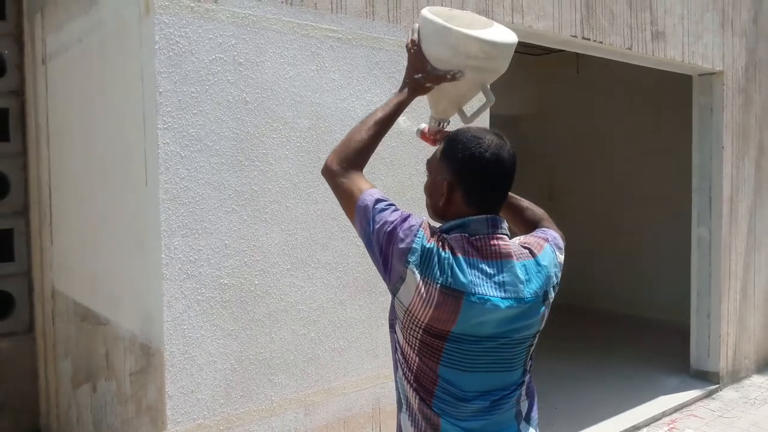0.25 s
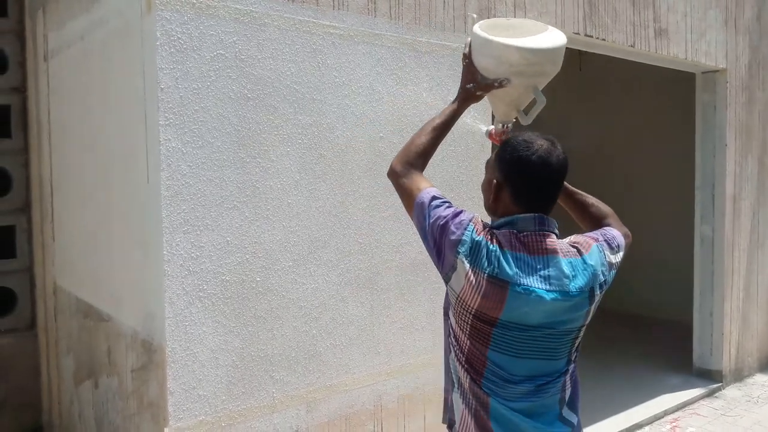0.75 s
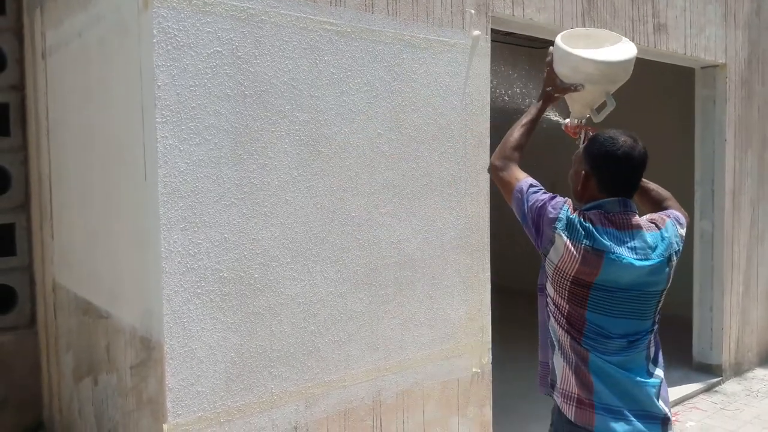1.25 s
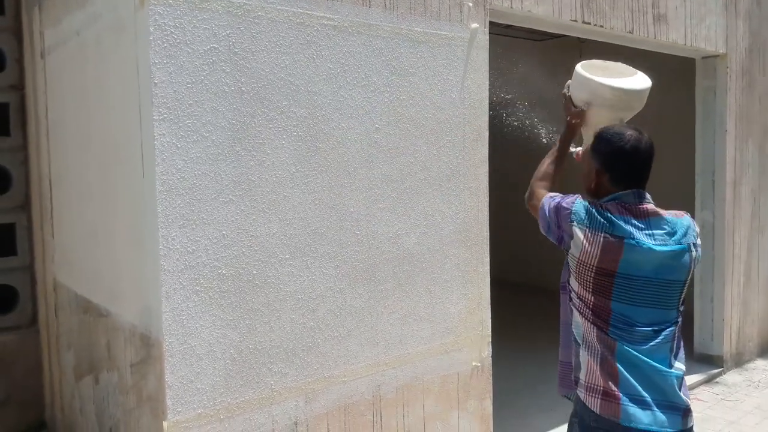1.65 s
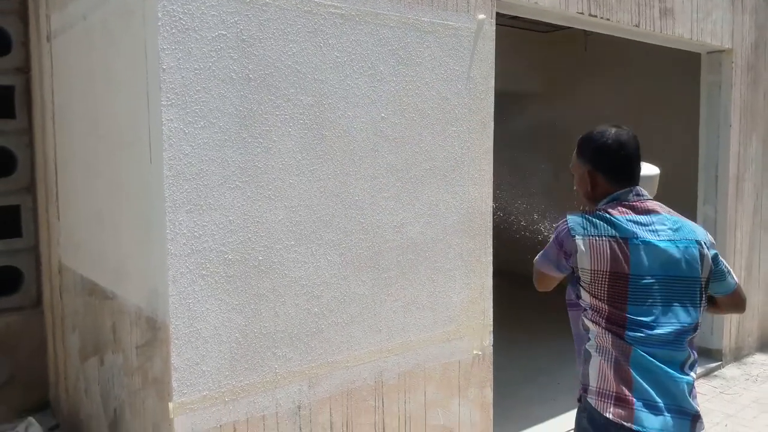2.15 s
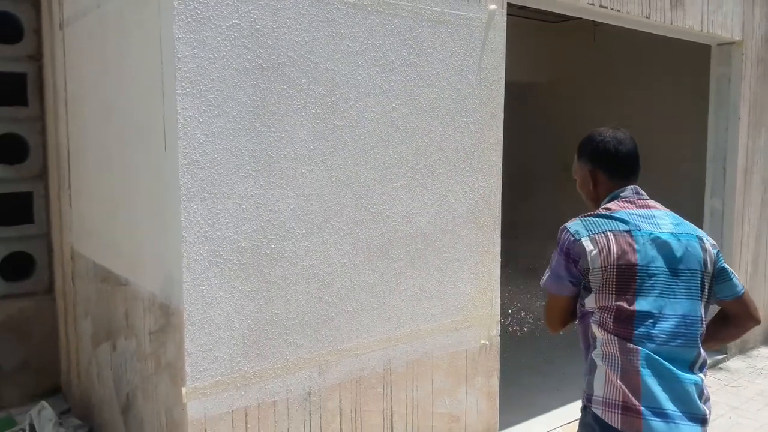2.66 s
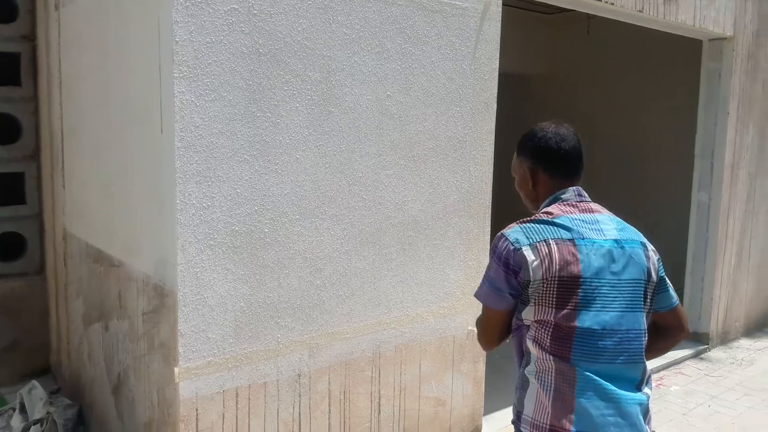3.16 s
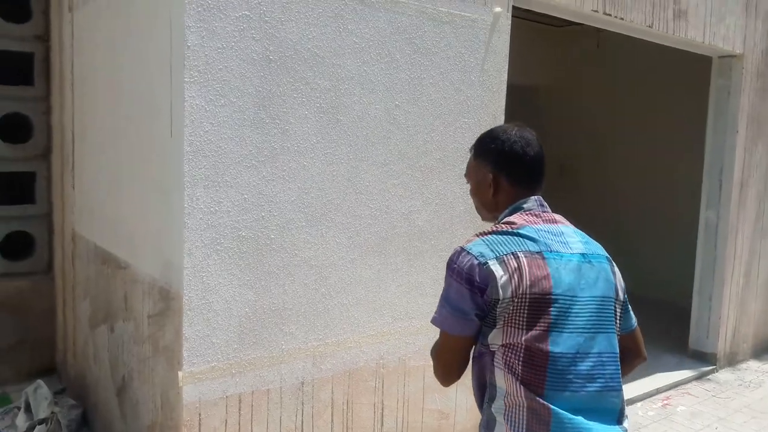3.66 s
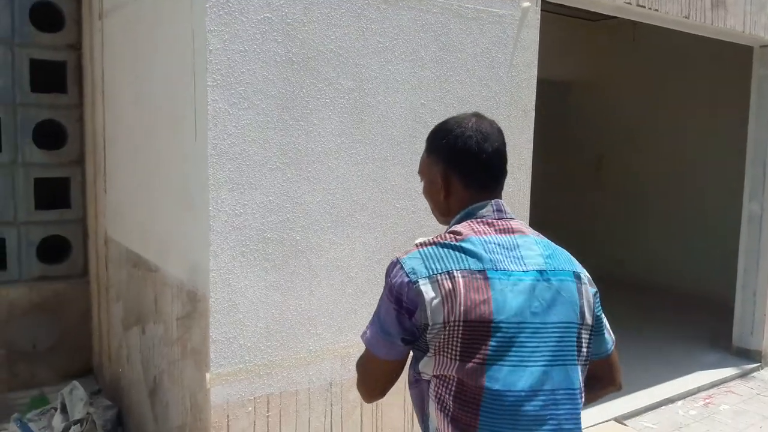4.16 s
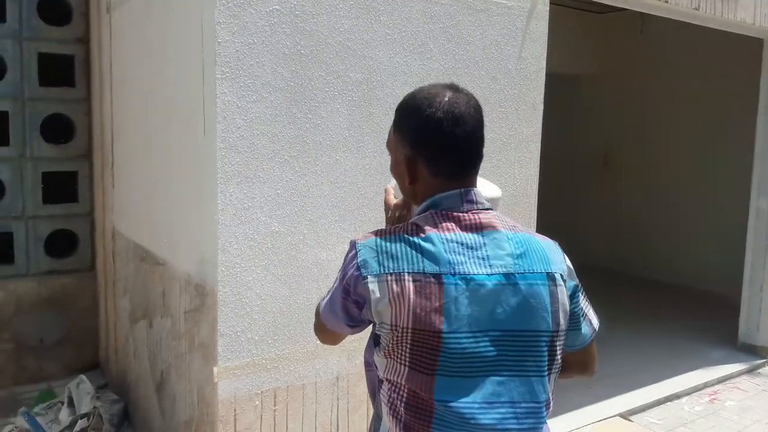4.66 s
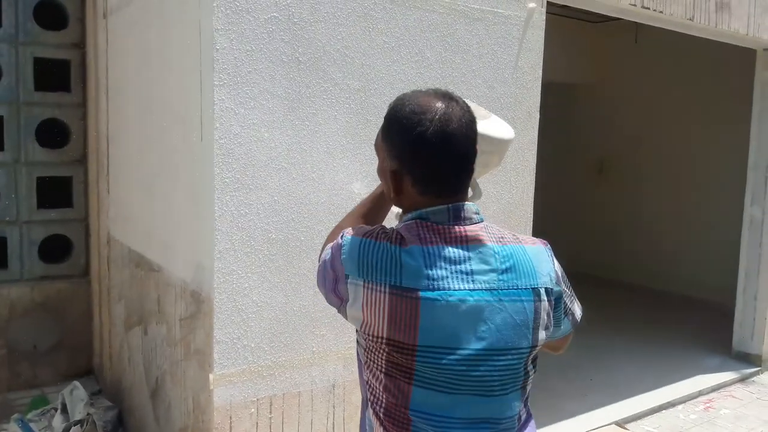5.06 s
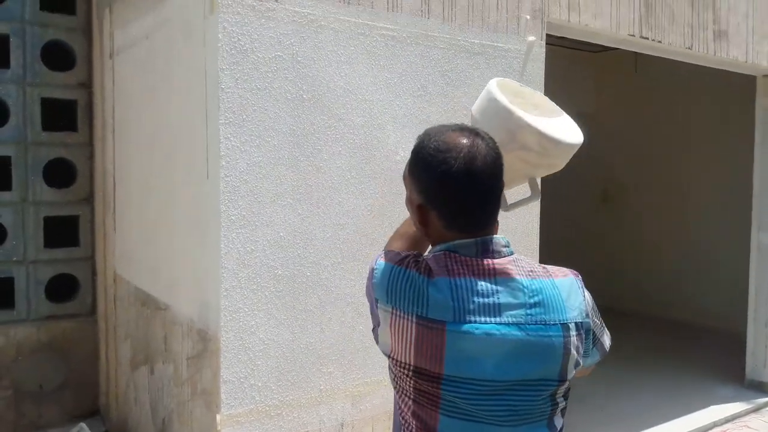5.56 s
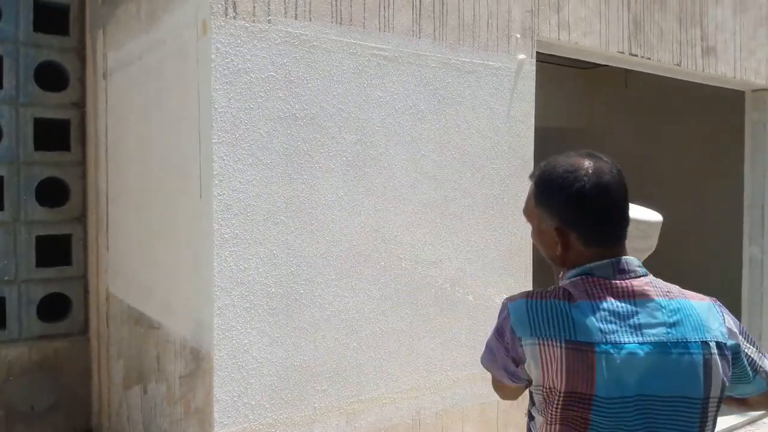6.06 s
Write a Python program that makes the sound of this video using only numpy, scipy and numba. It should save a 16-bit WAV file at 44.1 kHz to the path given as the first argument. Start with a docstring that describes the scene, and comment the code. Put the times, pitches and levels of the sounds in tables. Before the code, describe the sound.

A loud, uneven jet of compressed air hisses and sputters wet, gritty coating outdoors, snapping and ticking, with wind buffeting the microphone near the end.

```python
"""A hopper gun sprays textured coating on an outdoor wall, heard at two microphone ports.
The air jet hisses (filtered noise), and blobs torn off at the nozzle sputter and ring the hollow gun.
Larger lumps snap and thump, and coarse grains tick. The echo off the ground sweeps as the gun is
lowered and raised. Late on, gusts buffet the ports with fluttering low noise."""
import sys
import numpy as np
from scipy import signal
from scipy.fft import rfft, irfft
from scipy.io import wavfile
from scipy.ndimage import uniform_filter1d, map_coordinates
from numba import njit

SR = 44100
rng = np.random.default_rng(int(sys.argv[2]) if len(sys.argv) > 2 else 0)


def digitize_waveform(pressure):
    """Quantize a signal to 16-bit integers and store it at the path in sys.argv[1].

    Rows of a 2-D input are taken as channels; values are limited to [-1, 1].
    """
    field = np.atleast_2d(pressure).T
    bounded = np.clip(field, -1, 1)
    quanta = np.round(bounded * 32767).astype(np.int16)
    wavfile.write(sys.argv[1], SR, quanta)


N = 278712
T = np.arange(N) / SR  # time in seconds

# strength of the air jet: start_s, hiss_db, sizzle_db [s, dB, dB], before the gains in hiss() and sizzle()
JET_LEVELS = [(0, -25.5, -28.5), (.67, -27, -28.5), (1.0, -27.5, -30), (1.2, -29, -28), (1.65, -30.5, -31),
              (1.85, -30, -31.5), (2.32, -28, -29), (2.38, -30.5, -26), (2.65, -29, -27.5),
              (3.27, -25.5, -29), (3.5, -24.5, -26.5), (4.15, -28, -31.5), (4.24, -27, -29),
              (4.49, -29, -33), (5.05, -29, -32.5), (5.49, -27, -32), (5.65, -28.5, -29.5),
              (5.84, -28.5, -30.5), (6.23, -22.5, -27.5), (6.32, -27.5, -29.5)]
# the nozzle moves sideways and hides behind the worker:
# start_s, left_lead_ms, direct_db [s, ms, dB], the last before the clear_db in shaded()
NOZZLE_SIGHT = [(0, 0.04, -10), (.45, 0.13, -6.5), (.8, 0.11, -2), (1.2, 0.068, -1), (1.55, 0.055, -6.5),
                (2.2, 0.048, 0), (2.7, 0.053, 0.5), (3.1, 0.068, -3.5), (3.4, 0.11, 0), (3.85, .11, -6),
                (4.2, 0.096, -4), (4.5, 0.0089, -13), (5.15, 0.066, -13), (5.45, -0.017, -2),
                (5.7, 0.013, -3), (5.85, 0.083, -15), (6.15, 0.096, 1), (6.32, 0.087, 0)]
# tone of a low thud, before its level is set: pitch_hz, level_db [Hz, dB]
THUD_TONE = [(20, -20), (70, -10), (150, 3.5), (280, -16), (500, 1), (700, -5), (2500, -9)]
WAVERS_PER_S = 6  # pace of the slow wavering of the jet


def undb(db):
    """Turn decibels into a gain."""
    return 10 ** (np.asarray(db) / 20)


def unit(x):
    """Scale to an average (rms) level of 1."""
    return x / np.sqrt(np.mean(x ** 2))


def curves(table):
    """Join the rows of a table by straight lines in time, one curve for each column."""
    s, *columns = np.transpose(table)
    return [np.interp(T, s, column) for column in columns]


def walk(rate):
    """Smooth random wandering with spread 1; rate is in steps per second."""
    step = max(int(SR / rate), 2)
    wander = np.interp(np.arange(N) / step, np.arange(8192), rng.standard_normal(8192))
    return unit(uniform_filter1d(wander, step))


def colour(x, points, size=2048):
    """Filter to a (Hz, dB) spectrum, with no sound ahead of its cause."""
    hz, db = np.transpose(points)
    f = np.maximum(np.fft.rfftfreq(size, 1 / SR), 1)
    log_gain = np.log(undb(np.interp(np.log(f), np.log(hz), db)))
    # folding the cepstrum gives the filter its minimum phase
    cepstrum = irfft(log_gain)
    cepstrum[1:size // 2] *= 2
    cepstrum[size // 2 + 1:] = 0
    response = irfft(np.exp(rfft(cepstrum)))
    return signal.fftconvolve(x, response)[:N]


def delay(x, ms):
    """Hear the sound over a path whose length can change, which bends its pitch."""
    return map_coordinates(x, [np.arange(N) - ms * SR / 1000], order=3, mode="mirror")


@njit
def resonate(x, hz, width):
    """Pass a band around a moving centre (state-variable filter; centre and width in Hz)."""
    y, band, low = np.empty(len(x)), 0., 0.
    for i in range(len(x)):
        g, k = np.tan(np.pi * hz[i] / SR), width / hz[i]
        v = (band + g * (x[i] - low)) / (1 + g * (g + k))
        band, low, y[i] = 2 * v - band, low + 2 * g * v, k * v
    return y


def ring(drive, hz, db, width_hz, air_db=-7):
    """One resonance, rung by the sputter and by air blowing past."""
    blown = drive + undb(air_db) * rng.standard_normal(N)
    once = resonate(blown, hz, float(width_hz))
    twice = resonate(once, hz, float(width_hz))
    return unit(twice) * undb(db)


def steady(x, firm, over_s):
    """Even out the swells of a random vibration (firm 0: not at all, 1: fully)."""
    span = int(over_s * SR)
    power = uniform_filter1d(uniform_filter1d(x ** 2, span), span)
    return unit(x / np.maximum(power, 1e-9) ** (np.clip(firm, 0, 1) / 2))


def bursts(table, decay_s):
    """An envelope that jumps at each (s, dB) event and dies away."""
    out = np.zeros(N)
    for s, db in table:
        i = int(s * SR)
        out[i:] += undb(db) * np.exp(-T[:N - i] / decay_s)
    return out


def scatter(x, tail, count=70):
    """Diffuse echoes whose pattern keeps turning over as the gun travels."""
    out, hop = np.zeros(N + len(tail)), N // count + 1
    for centre in range(0, N + hop, hop):
        i = np.arange(max(centre - hop, 0), min(centre + hop, N))
        faded = x[i] * np.cos(np.pi / 2 * (i - centre) / hop)
        piece = signal.fftconvolve(faded, tail * rng.standard_normal(len(tail)))
        out[i[0]:i[0] + len(piece)] += piece
    return out[:N]


def yard(x, direct=1, scatter_db=-2.5, scatter_s=0.0087, room_db=-15, room_t60=0.23):
    """Direct sound, sweeping echoes off ground and wall, nearby scatter and a short doorway tail."""
    # the gun is lowered, held and raised again: start_s, height_m, ground_echo_db [s, m, dB]
    gun_path = [(0, 1.68, -8), (.8, 1.59, -6), (1.3, 1.38, -5), (1.7, 1.31, -6), (2.0, 1.24, -5),
                (2.35, 1.06, -6), (2.7, .92, -6), (3.4, .9, -10), (4.2, 1.0, -13), (5.0, 1.2, -18),
                (5.7, 1.3, -15), (6.32, 1.13, -8)]
    # echo off the sprayed wall: start_s, delay_ms, level_db [s, ms, dB]
    wall_echo = [(0, 3.7, -13), (1.0, 3.72, -9), (1.55, 3.68, -7), (2.0, 3.45, -8), (2.5, 3.0, -9),
                 (3.1, 2.9, -12), (3.7, 3.0, -12), (4.5, 3.75, -17), (6.32, 4.55, -12)]
    # tone of an echo off masonry or ground: pitch_hz, level_db [Hz, dB]
    echo_tone = [(200, -16), (1200, -8), (3000, -2.5), (8000, 1), (16000, -4)]
    # tone of the scattered sound: pitch_hz, level_db [Hz, dB]
    scatter_tone = [(100, -10), (350, -15), (800, -5), (1500, -1), (3500, 1), (8000, 2), (16000, 1)]
    height_m, ground_db = curves(gun_path)
    ground_ms = 2.3 * height_m  # the echo comes later the higher the gun is
    wall_ms, wall_db = curves(wall_echo)
    lead_ms, _ = curves(NOZZLE_SIGHT)

    t = T[:SR // 10]
    room_s = room_t60 / np.log(1000)
    masonry = undb(scatter_db) * np.exp(-t / scatter_s) / np.sqrt(scatter_s * SR / 2)
    doorway = undb(room_db) * np.exp(-t / room_s) / np.sqrt(room_s * SR / 2)
    tail = np.hypot(masonry, doorway) * (t > .0003)

    echo, wet = colour(x, echo_tone), colour(x, scatter_tone)
    ports = []
    for side in (-1, 1):  # left, right
        lag_ms = side * lead_ms / 2
        near = delay(x, lag_ms)
        near += undb(ground_db) * delay(echo, ground_ms + lag_ms)
        near += undb(wall_db) * delay(echo, wall_ms + lag_ms)
        ports.append(direct * near + scatter(wet, tail))
    return np.array(ports)


def blobs(per_s=135, uneven=.5, spread_db=2.5, count=2000):
    """Coating is torn off the nozzle in blobs, at uneven intervals; the bore limits their size."""
    gap, size = rng.standard_normal((count, 2)).T
    gaps = np.exp(uneven * gap - uneven ** 2 / 2) / per_s
    at = (np.cumsum(gaps) * SR).astype(int)
    out = np.zeros(N)
    out[at[at < N]] = undb(spread_db * np.minimum(size, 1))[at < N]
    return out


def surge(torn, puff_s=0.0035, depth=.7):
    """Each blob is followed by a short puff of finer spray, on top of a constant flow."""
    puffs = signal.lfilter([1], [1, -np.exp(-1 / (puff_s * SR))], torn)
    return unit(1 + depth * puffs / puffs.mean())


def pops(flow, per_s, spread_db, cap_db):
    """Bits torn off by the jet: one-sided pressure snaps, many small and a few large."""
    fired = rng.random(N) < per_s * flow / SR
    size_db = np.minimum(spread_db * rng.exponential(size=N), cap_db)
    return unit(-1. * fired * undb(size_db))


def nozzle(torn, flow, soft_hz=2600, fine_db=1, rush_db=0):
    """The soft plop of each blob, finer snaps, and the rush of air that carries them."""
    soften = signal.butter(1, soft_hz, fs=SR, output="sos")
    plop = signal.sosfilt(soften, unit(torn))
    fine = pops(flow, per_s=600, spread_db=11.0, cap_db=4.0)
    rush = unit(flow * rng.standard_normal(N))
    return unit(-undb(1.5) * plop + undb(fine_db) * fine + undb(rush_db) * rush)


def air(flow, spectrum, wide_db, flutter_db=2.5, grit_db=0):
    """Turbulence swelling with each puff: the gritty nozzle part, then the wide fan at each port."""
    flutter = flow ** 0.21 * undb(flutter_db * walk(500))
    grit = pops(flow, per_s=500, spread_db=2.0, cap_db=8.5)
    core = unit(colour(rng.standard_normal(N) * flutter + undb(grit_db) * grit, spectrum))
    fan = np.array([unit(colour(rng.standard_normal(N) * flutter, spectrum)) for _ in range(2)])
    total = np.hypot(1, undb(wide_db))
    return core / total, fan * undb(wide_db) / total


def shaded(core, fan, clear_db, scattered=0.54):
    """The jet is focused in sight and diffuse behind the worker's back, at about the same loudness."""
    _, direct_db = curves(NOZZLE_SIGHT)
    direct = undb(direct_db + clear_db)
    loudness = np.sqrt(np.var(core) * (direct ** 2 + scattered) + np.var(fan))
    return (yard(core, direct) + fan) / loudness


def hiss(flow):
    """The main rush of the jet: turbulent noise that wavers slowly in level."""
    # tone of the hiss, before its level is set: pitch_hz, level_db [Hz, dB]
    hiss_tone = [(100, -51.5), (300, -13.5), (570, -17.5), (850, -12), (2200, -3), (3300, -0.1), (4300, 0),
                 (5600, -1.5), (7000, -3), (7800, -7.5), (10000, -17), (16000, -46)]
    level_db, _ = curves(JET_LEVELS)
    rush = shaded(*air(flow, hiss_tone, wide_db=-7.5), clear_db=1.5)
    return rush * undb(level_db + 5.5 + .5 * walk(WAVERS_PER_S))


def sizzle(flow):
    """The top of the jet: higher, calmer turbulent noise that wavers slowly in level."""
    # tone of the sizzle, before its level is set: pitch_hz, level_db [Hz, dB]
    sizzle_tone = [(3000, -41), (6500, -5), (8300, -2), (10000, -1), (12500, -1), (14000, -3.5),
                   (15500, -2)]
    _, level_db = curves(JET_LEVELS)
    rush = shaded(*air(flow, sizzle_tone, wide_db=-6, flutter_db=1.2), clear_db=1.0)
    return rush * undb(level_db + 5.5 + .4 * walk(WAVERS_PER_S))


def sputter(drive):
    """Coating leaves the nozzle unevenly, so its plops and snaps surge in level."""
    # flow of coating, thickest as the gun is raised again: start_s, level_db [s, dB], before a 4.5 dB gain
    feed = [(0, -36.5), (1.6, -38), (2.5, -34.5), (3.1, -34), (3.9, -36.5), (4.15, -32.5), (4.9, -32.5),
            (5.3, -30), (5.9, -30), (6.32, -39.5)]
    # tone of the sputter, before its level is set: pitch_hz, level_db [Hz, dB]
    sputter_tone = [(30, -20), (90, -10.5), (190, -16.5), (285, -14.5), (490, 9.5), (580, -0.5), (700, -6),
                    (950, 9), (1150, 8), (1600, 7.5), (2200, 8), (4000, -3.5), (7000, -18), (15000, -8.5)]
    surge_db, surges_per_s = 0.5, 14
    level_db = curves(feed)[0] + surge_db * walk(surges_per_s)
    return unit(colour(drive, sputter_tone)) * undb(level_db + 4.5)


def hum(drive, hz, db, width_hz=80, skirt_db=-8, skirt_hz=200):
    """The low resonance: a firm core kept going by the air stream, in a wider, sputtering skirt."""
    core = steady(ring(drive, hz, 0, width_hz, air_db=0), firm=.15, over_s=.03)
    return core * undb(db) + ring(drive, hz, db + skirt_db, skirt_hz)


def hollow(drive):
    """Four resonances of gun and hopper that shift as the gun moves."""
    # ring of gun and hopper: start_s, low_db, upper_db [s, dB, dB], before the trims below
    ring_levels = [(0.05, -40, -35), (0.12, -38.5, -37), (1.16, -42.5, -38), (1.5, -50, -32.5),
                   (2.29, -52, -31), (2.64, -37.5, -30), (3.25, -35, -33.5), (3.6, -33.5, -34),
                   (3.95, -35, -36), (4.07, -29, -29.5), (4.45, -29.5, -28), (4.8, -30, -28),
                   (5.24, -36, -30), (6.2, -40, -33)]
    # their pitches shift as the gun is turned: start_s, low_hz, upper_hz [s, Hz, Hz]
    ring_pitches = [(0, 378, 772), (1, 412, 808), (1.6, 412, 753), (2.7, 381, 746), (3.3, 430, 710),
                    (4.1, 422, 800), (4.7, 389, 764), (5.1, 356, 765), (6.32, 373, 730)]
    # the hopper's open mouth: start_s, pitch_hz, level_db [s, Hz, dB]
    open_mouth = [(0, 880, -40), (1.4, 924, -43.5), (2.0, 960, -40.5), (2.7, 900, -36), (3.5, 870, -41.5),
                  (4.3, 926, -36.5), (5.4, 850, -33.5), (6.32, 900, -31.5)]
    # a nasal resonance, out while the gun is held low: start_s, pitch_hz, level_db [s, Hz, dB]
    nasal_ring = [(1.6, 1640, -50), (2.5, 1760, -57), (2.95, 1910, -35.5), (3.25, 1920, -31),
                  (3.45, 1940, -41), (3.65, 1880, -34.5), (3.85, 1940, -36), (4.06, 2150, -29),
                  (4.35, 2240, -33), (4.6, 2320, -48)]
    low_db, upper_db = curves(ring_levels)
    low_hz, upper_hz = curves(ring_pitches)
    low = hum(drive, low_hz, low_db - 2.5)
    upper = ring(drive, upper_hz, upper_db - 4.5, width_hz=173)
    mouth = ring(drive, *curves(open_mouth), width_hz=247)
    nasal = ring(drive, *curves(nasal_ring), width_hz=560, air_db=0)
    return low + upper + mouth + nasal


def keen_edge(drive):
    """A keen band of noise on the hiss that shifts with the aim of the nozzle."""
    # the keen band: start_s, pitch_hz, level_db [s, Hz, dB]
    keen_band = [(0, 5100, -44), (.45, 4800, -37), (.7, 4700, -25), (1.05, 4700, -45), (1.9, 5300, -46),
                 (2.4, 5700, -33), (3.0, 5780, -34), (3.5, 6330, -39), (4.2, 6830, -50), (4.7, 6400, -42),
                 (5.7, 6600, -58), (6.0, 6550, -33), (6.32, 6700, -44)]
    return ring(drive, *curves(keen_band), width_hz=1000, air_db=3)


def lumps(count=80):
    """A lump leaves with a snap, some spray and a low thump; small ones come at random times."""
    # large lumps leaving the nozzle: start_s, snap_db, thump_db [s, dB, dB], before tone filters and smoothing
    large = [(.076, -9, -55), (.124, -4, -54), (.207, -8, -55), (.241, -2, -55), (.366, -10, -55),
             (.559, -2, -21), (.664, -7, -21), (1.0, -18, -33), (1.21, -23, -40), (1.29, -18, -33),
             (1.34, -18, -36), (1.454, -5, -58), (1.767, -3, -58), (1.984, -6, -58), (2.041, 0, -61),
             (2.215, -14, -40), (2.26, -12, -41), (2.29, -8, -52), (2.444, -1.5, -39), (2.483, -0.5, -37),
             (2.533, -8, -36), (2.6, -3, -56), (2.719, -1, -55), (3.104, -9, -57), (3.16, -17, -41),
             (3.196, -17, -48), (3.246, -14, -58), (3.45, -21, -36), (3.785, -9, -38), (3.921, -5, -29),
             (4.38, -14, -42), (4.485, -8, -55), (4.69, -5, -55), (4.871, -4, -59), (4.971, -20, -55),
             (5.061, -2.5, -59), (5.195, 0.5, -42), (5.253, -2, -43), (5.33, -5, -42), (5.495, 0, -45),
             (5.555, -8, -48), (5.596, -2, -43), (5.75, -7, -51), (5.815, -1, -46.5), (5.885, -1, -48),
             (5.942, -1, -45), (5.988, -6, -45)]
    # tone of the snap and its spray: pitch_hz, level_db [Hz, dB]
    splat_tone = [(60, -20), (200, -13), (350, -3), (570, -6), (850, 2), (2000, 0), (4500, -4),
                  (15000, -19)]
    small_per_s, small_snap_db, small_thump_db, spread_db = 5, -7, -43, 3
    chance = rng.random((count, 3))
    at = (np.arange(count) + chance[:, 0]) / small_per_s  # one at random in each time slot
    shifts_db = spread_db * (1 - 2 * chance[:, 1:])
    small = [(s, small_snap_db + a, small_thump_db + b) for s, (a, b) in zip(at, shifts_db) if s < T[-1]]
    s, snap_db, thump_db = np.transpose(list(large) + small)

    snap = -bursts(zip(s, snap_db), decay_s=.00004)
    spray = bursts(zip(s, snap_db), decay_s=.006) * rng.standard_normal(N)
    splat = colour(snap + undb(-11) * spray, splat_tone)
    push = uniform_filter1d(bursts(zip(s, thump_db), decay_s=0.016), size=120)
    thumps = [push * unit(colour(rng.standard_normal(N), THUD_TONE)) for _ in range(2)]
    return splat, np.array(thumps)


def ticks():
    """Each coarse grain rings for a few cycles, at a pitch of its own."""
    # grains ticking out of the spray: start_s, level_db [s, dB], before the 2 dB gain and the low cut
    grains = [(.201, -20), (0.267, 3), (0.273, -1), (.347, -14), (.438, -21), (0.523, -25), (0.558, -1),
              (.563, -1), (.589, -1), (.628, -1), (0.631, 2), (0.679, -10), (.803, -20), (1.040, -13),
              (1.909, -13), (1.920, -6), (2.036, -10), (2.068, -5), (2.438, -5), (2.495, -13), (2.686, -4),
              (2.787, -6), (2.987, -8), (3.161, -14), (3.180, -17), (3.257, -17), (3.450, -12),
              (3.572, -10), (3.685, 2), (3.773, -13), (3.793, -3.5), (3.875, -1), (3.939, -6), (4.131, -21),
              (5.1, -8), (5.441, -7), (5.531, -7), (5.949, -8), (6.236, -2), (6.295, -5)]
    usual_hz, decay_s, left_minus_right_db = 4800, .0003, -1.5
    out, t = np.zeros(N), T[:256]
    for (s, db), size in zip(grains, rng.standard_normal(len(grains))):
        i = int(s * SR)
        tone = np.sin(2 * np.pi * usual_hz * np.exp(.1 * size) * t)
        out[i:i + len(t)] -= undb(db + 2) * np.exp(-t / decay_s) * tone
    low_cut = signal.butter(2, 1500, "high", fs=SR, output="sos")
    out = signal.sosfilt(low_cut, out)
    lead_ms, _ = curves(NOZZLE_SIGHT)
    return np.array([delay(out, -side * lead_ms / 2) * undb(side * left_minus_right_db / 2)
                     for side in (1, -1)])


def shrill_band(drive):
    """A shrill band of the jet that swells and rises in pitch with the rasp."""
    # the shrill band: start_s, pitch_hz, level_db [s, Hz, dB]
    shrill_curve = [(.7, 10400, -54), (1.1, 10600, -38), (1.7, 10600, -40), (2.25, 11400, -36),
                    (2.65, 12800, -30), (2.95, 13100, -36), (3.3, 12100, -43), (3.7, 12000, -54)]
    return ring(drive, *curves(shrill_curve), width_hz=2600)


def rasp(drive):
    """A broad band of noise from the jet that rises as the gun comes down."""
    # the rasp: start_s, pitch_hz, level_db [s, Hz, dB]
    rasp_band = [(.8, 2900, -62), (1.25, 2980, -37), (1.55, 3480, -34), (1.9, 3770, -32.5),
                 (2.28, 3930, -38), (2.39, 4080, -25.5), (2.55, 4080, -33), (3.05, 4150, -31),
                 (3.5, 4100, -47), (4.1, 4200, -37)]
    return ring(drive, *curves(rasp_band), width_hz=1200, air_db=0)


def sway(pan_db):
    """Left and right gains as the gun swings about its usual place."""
    return undb(np.array([[1], [-1]]) * (pan_db - pan_db.mean()) / 2)


def dip(ports, table, width_hz):
    """Take part of a narrow, drifting band out of the spray."""
    hz, db = curves(table)
    return np.array([x - (1 - undb(db)) * resonate(x, hz, float(width_hz)) for x in ports])


def drifting_hollows(spray):
    """Two shallow hollows drift through the spray, the lower one rising in pitch."""
    # the lower hollow: start_s, pitch_hz, depth_db [s, Hz, dB]
    lower_dip = [(.6, 3700, 0), (.95, 3900, -3), (1.3, 4650, -3.5), (1.5, 4660, -4), (1.85, 4700, -1.5),
                 (2.3, 5000, 0)]
    # the higher hollow: start_s, pitch_hz, depth_db [s, Hz, dB]
    higher_dip = [(.9, 7600, 0), (1.4, 7800, -3), (2.05, 7700, -2), (2.6, 7900, 0), (3.5, 7900, -1),
                  (5.0, 8000, -2), (6.0, 7900, 0)]
    return dip(dip(spray, lower_dip, width_hz=1000), higher_dip, width_hz=660)


def drone(drive):
    """A dull, narrow resonance under the spray while the gun is in front of the doorway."""
    # the drone: start_s, pitch_hz, level_db [s, Hz, dB]
    drone_band = [(1.1, 270, -59), (1.6, 250, -56.5), (2.4, 263, -48.5), (2.9, 297, -45.5), (3.7, 304, -48),
                  (4.1, 303, -55)]
    return ring(drive, *curves(drone_band), width_hz=72)


def wind(flutter_db=3, flutters_per_s=170, thud_db=-7):
    """A faint rumble, then a fluttering breeze with short gusts; each port has its own eddies."""
    # the breeze reaches the left port first: start_s, left_db, right_db [s, dB, dB]
    breeze = [(0, -70, -61), (4.9, -65, -70), (5.2, -31, -50), (5.55, -43, -50), (5.75, -48, -39),
              (6.0, -39, -36.5), (6.32, -41, -33)]
    # gusts on the ports: middle_s, length_s, left_db, right_db [s, s, dB, dB]
    gust_list = [(5.092, 0.035, -33, -57), (5.14, 0.035, -26.5, -58), (5.19, .03, -29, -45),
                 (5.25, 0.078, -33, -45), (5.31, 0.022, -26, -52), (5.355, 0.036, -27, -50),
                 (5.414, 0.028, -39, -31.5), (5.51, 0.021, -28, -52), (5.6, .03, -32, -50),
                 (5.646, 0.018, -20, -52), (5.675, 0.02, -21.5, -39), (5.72, 0.027, -18.5, -35),
                 (5.774, 0.03, -55, -36), (5.831, 0.039, -22, -30), (5.877, 0.044, -20, -35),
                 (5.93, 0.037, -43, -35), (6.049, 0.028, -25, -27), (6.113, 0.038, -36, -26.5),
                 (6.164, .02, -24, -25.5), (6.187, 0.016, -36, -19), (6.26, .05, -37, -37),
                 (6.315, 0.021, -28, -24.5)]
    # tone of the eddies, before their level is set: pitch_hz, level_db [Hz, dB]
    wind_tone = [(20, -30), (50, -23), (90, -0.5), (135, 3), (230, -5), (400, -9.5), (900, -28),
                 (3000, -77)]
    edge_s = 0.026  # rise and fall of a gust
    ports = []
    for side, breeze_db in enumerate(curves(breeze)):
        gusts = np.zeros(N)
        for s, length_s, *db in gust_list:
            shape = np.clip((length_s / 2 - np.abs(T - s)) / edge_s + .5, 0, 1)
            gusts += undb(db[side]) * shape
        eddies = steady(colour(rng.standard_normal(N), wind_tone), firm=.75, over_s=.015)
        thuds = unit(colour(rng.standard_normal(N), THUD_TONE))
        flutter = unit(undb(flutter_db * walk(flutters_per_s)))
        strength = np.hypot(undb(breeze_db), gusts)
        ports.append(flutter * (strength * eddies + undb(thud_db) * gusts * thuds))
    return np.array(ports)


def scene():
    """One uneven flow of coating drives the sputter, the resonances and the hiss."""
    # where the jet is heard, left minus right: start_s, hiss_db, sizzle_db [s, dB, dB]
    # (only the swing about each column's average over time is used)
    jet_pan = [(0.0, -8, 2), (0.54, -6.5, 6), (2.46, -6.5, 4.5), (2.6, -8, 1), (3.47, -7.5, 5.5),
               (4.15, -7.5, 4), (5.67, -6, 7), (6.0, -7.5, 2), (6.32, -8, 2)]
    hiss_pan_db, sizzle_pan_db = curves(jet_pan)
    torn = blobs()
    flow = surge(torn)
    drive = nozzle(torn, flow)
    splat, thumps = lumps()
    from_gun = sputter(drive) + hollow(drive) + splat + rasp(drive) + keen_edge(drive) + drone(drive)
    body = yard(from_gun) + hiss(flow)
    top = sizzle(flow) + yard(shrill_band(drive))
    spray = body * sway(hiss_pan_db) + top * sway(sizzle_pan_db)
    return drifting_hollows(spray) + ticks() + thumps + wind()


def record(dry):
    """Each port colours the sound its own way; high peaks are rounded and the top is cut steeply."""
    # how much more the left port hears than the right: pitch_hz, level_db [Hz, dB]
    port_tone = [(100, -2.5), (350, -3.5), (2400, -3.5), (5900, -4.5), (6850, -8), (7800, -2.5), (8500, 7),
                 (9700, 1), (11500, 1.5), (13000, -1), (15200, -6)]
    ports = []
    for x, side in zip(dry, (1, -1)):
        ports.append(colour(x, [(hz, side * db / 2 - .5) for hz, db in port_tone]))
    ports = np.array(ports)
    rounded = ports / (1 + (ports / .9) ** 6) ** (1 / 6)  # never beyond 0.9
    top_cut = signal.ellip(12, .05, 60, 15800, fs=SR, output="sos")  # edge at 15800 Hz
    return signal.sosfiltfilt(top_cut, rounded)


dry = scene()
out = record(dry)
digitize_waveform(out)
```